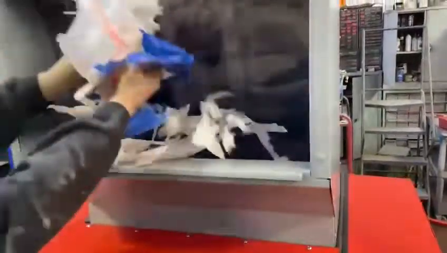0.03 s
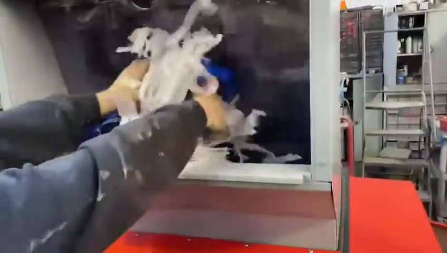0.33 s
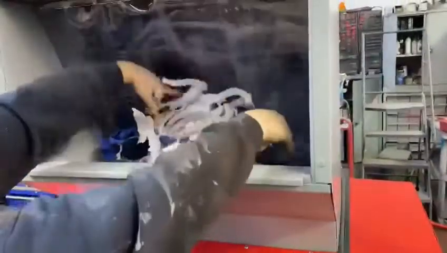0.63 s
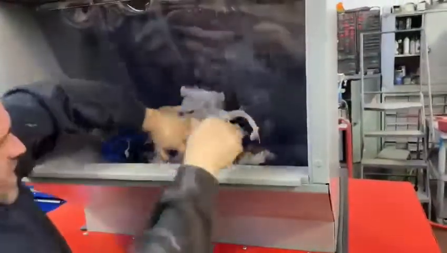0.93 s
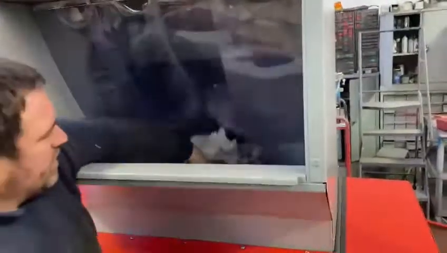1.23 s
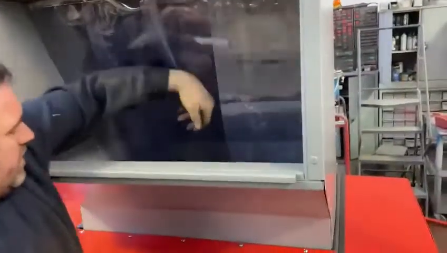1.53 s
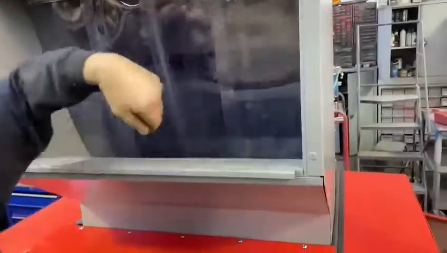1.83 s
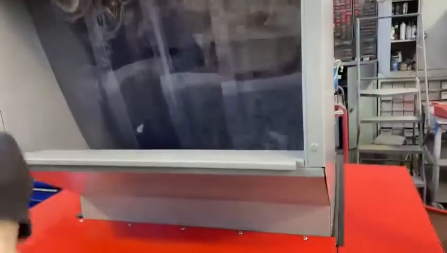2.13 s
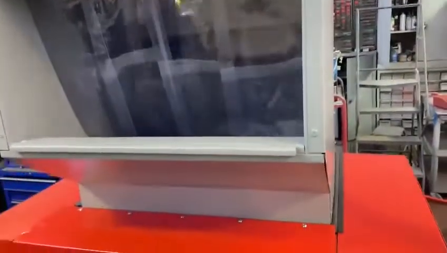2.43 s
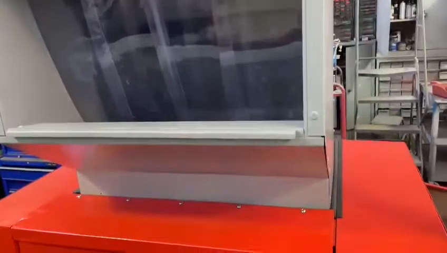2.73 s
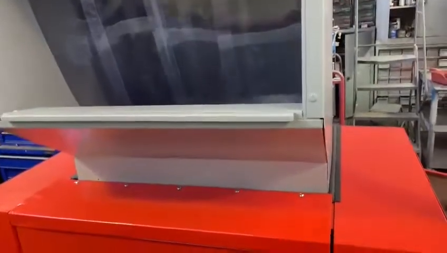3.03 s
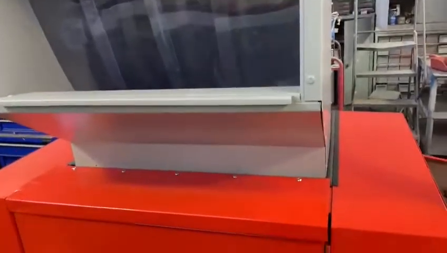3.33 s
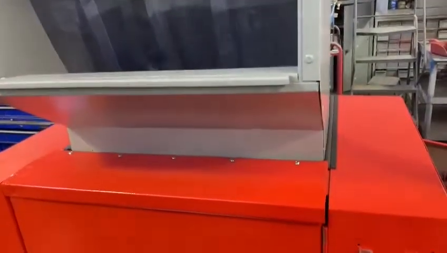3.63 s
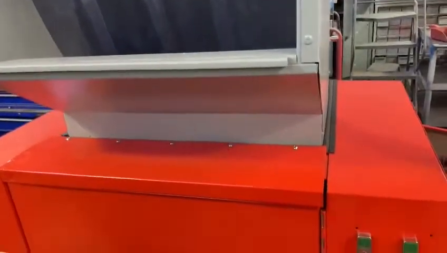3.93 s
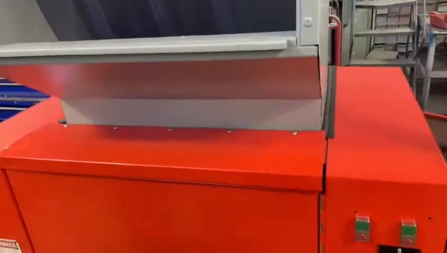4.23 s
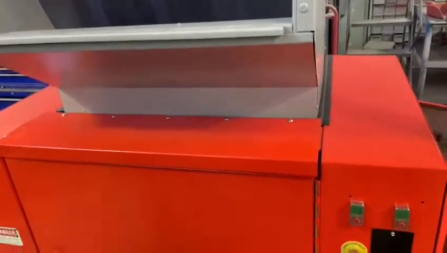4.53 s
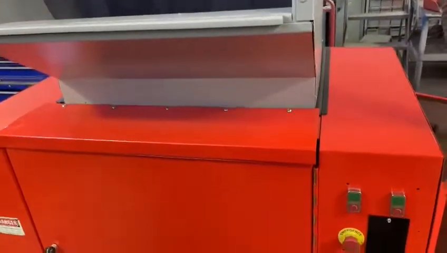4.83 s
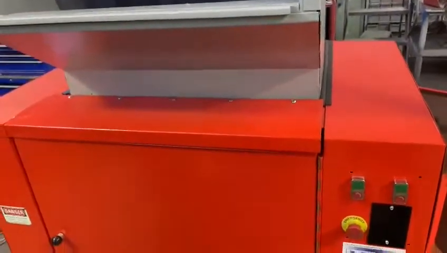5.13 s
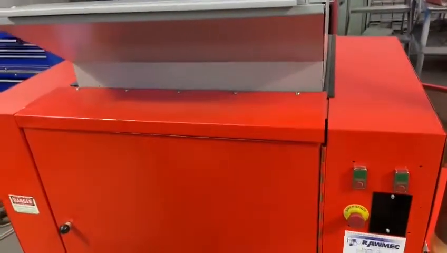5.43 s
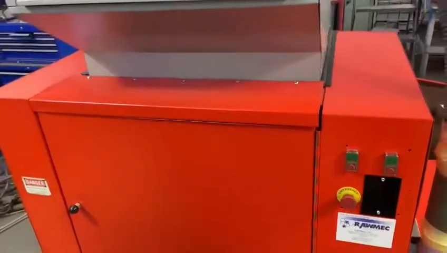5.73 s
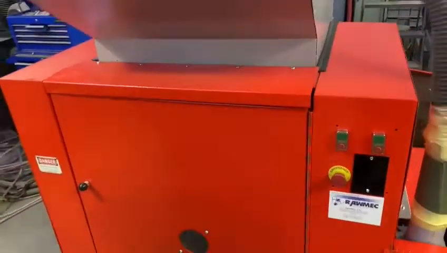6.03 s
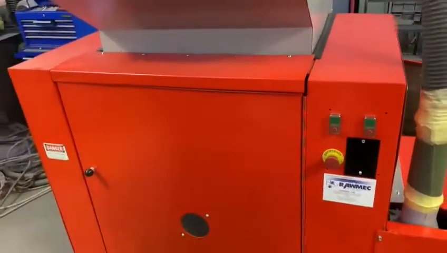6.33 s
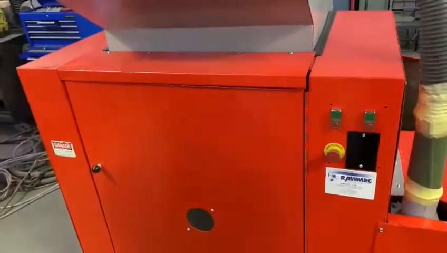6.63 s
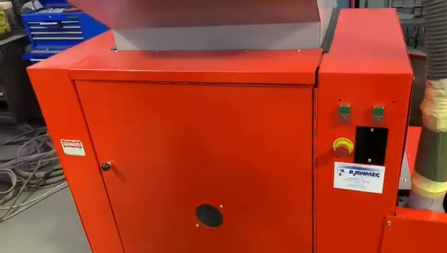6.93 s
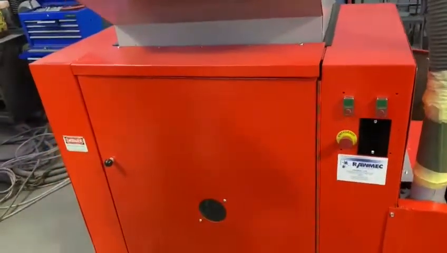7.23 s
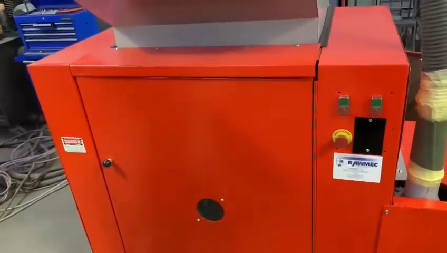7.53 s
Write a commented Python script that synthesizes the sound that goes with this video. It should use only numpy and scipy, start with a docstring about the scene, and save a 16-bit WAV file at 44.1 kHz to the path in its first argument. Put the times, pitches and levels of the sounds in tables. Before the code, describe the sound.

Plastic scraps crunch and crack in a workshop grinding machine, its motor roaring steadily while fragments hail and hiss inside.

```python
"""Plastic granulator chewing strips

Strips rustle and squeal into the hopper (the feed funnel) of a machine in a workshop. A rotor with
three knives drones and chops them in surges. Chips hail against the steel chamber and ring its panels,
while a suction blower hums and draws the fine granules off with a hiss.
We listen from in front of the hopper, then lower down by the cabinet."""
import sys
import numpy as np
from scipy import signal
from scipy.fft import rfft, irfft
from scipy.io import wavfile
from scipy.ndimage import uniform_filter1d

SR = 44100
rng = np.random.default_rng(int(sys.argv[2]) if len(sys.argv) > 2 else 0)


def master_out(mix):
    """Clip the mix to full scale and print it as 16-bit PCM to the path in sys.argv[1]."""
    frames = np.transpose(np.atleast_2d(mix))
    ceiling = np.clip(frames, -1, 1)
    pcm = np.round(ceiling * 32767).astype(np.int16)
    wavfile.write(sys.argv[1], SR, pcm)


N = 343980
TIME, FREQ_HZ = np.arange(N) / SR, np.arange(N // 2 + 1) * SR / N
ROTOR_HZ, BLOWER_HZ = 23.19, 49.22  # turns per second
KNIVES, VANES = 3, 8  # blades on the rotor and in the blower
DIRECT = np.array([[1], [0]])  # sounds have two rows, direct and scattered; this keeps the first

# hard plastic crunching, heard through the hopper mouth: pitch_hz, width_hz, level_db
CRUNCH_MODES = [(1659, 55, 3.5), (1973, 260, 2), (2120, 280, -5.5), (2470, 160, -0.5)]
# notes of the air in the hopper: pitch_hz, width_hz, level_db
HOPPER_MODES = [(477, 57, 4.5), (577, 25, -3.5), (772.5, 22.6, 5.5), (826.5, 9.6, 2.5), (885, 6.8, 6.5),
                (995.6, 9.4, 5.5)]
# note of a ringing steel panel: pitch_hz, width_hz, level_db
PANEL_MODES = [(1294, 14, 0)]
# how squarely the listener faces the hopper mouth: time_s, level_db
FACING_MOUTH = [(0, 6), (3.2, -4.5), (4.5, -7), (7.8, -6.5)]


def knives(turns, chop_db, scatter_db=5, jitter_s=0.002255, crunch_db=-5, thump_db=-5):
    """Each passing knife cuts a random amount of plastic, thumping the chamber and crunching briefly."""
    # boom of the cutting chamber: pitch_hz, width_hz, level_db
    chamber_modes = [(93.5, 8.9, 1.5), (119.6, 18, 6.5), (143.5, 14, 4), (159.6, 8.7, -4), (233, 50, -3.5),
                     (354, 13, -1), (501, 130, -10)]
    pass_s = np.interp(np.arange(int(turns[-1] * KNIVES)) / KNIVES, turns, TIME)
    lateness, amount = rng.standard_normal((N // 100, 2))[:len(pass_s)].T
    cuts = unit(clicks(pass_s + jitter_s * lateness, undb(scatter_db * np.tanh(amount))))
    crunch = undb(crunch_db) * bursts(cuts, decay_s=0.0055)
    thumps = boom(cuts * DIRECT + crunch, chamber_modes)
    return thumps / thumps[0].std() * undb(chop_db + thump_db)


def splitting(chop_db, split_db=-10):
    """The harder the knives chop, the louder the plastic splits, in a rough run of small cracks."""
    # tone of splitting plastic: frequency_hz, level_db
    split_colour = [(250, -13.5), (600, 4.5), (1000, -2.5), (1700, -8.5), (2700, -8), (4100, 6.5),
                    (5200, -14), (10000, -25)]
    cracks = bursts(hail(330, spread_db=1.5), decay_s=0.0027)
    return colour(cracks, split_colour) * undb(chop_db + split_db)


def bites(bang_peak_db=-10.5, crack_peak_db=-17):
    """Thick pieces caught by the knives hammer the knife bed, blow after blow, and crack apart."""
    # blows on thick pieces: start_s, bang_db, crack_db
    blows = [(1.006, -5, 12), (1.052, -8, 7), (1.1, -8, 9), (1.698, -4, 7), (1.713, 12, 10),
             (1.728, 13.5, 6), (1.744, 12, 5), (1.757, 4, 1), (1.804, 5, 4), (1.816, 8, 1), (1.830, 7, 2),
             (1.846, 2, 1), (1.86, 8, 0), (1.873, 8, 4), (1.894, 4, -4), (2.018, 0, 13.5), (2.998, 3, 12),
             (3.584, 3.5, -12), (4.39, 7.5, -9), (5.433, 7, -8), (5.463, 10.5, -4), (5.476, 13, -4),
             (5.491, 5, -8), (5.511, 12, -6), (5.778, 5, -10), (6.683, 10, -2), (7.017, 1, 4)]
    # notes of the knife bed under a heavy blow: pitch_hz, width_hz, level_db
    bed_modes = [(114, 40, 6.5), (158, 35, -4.5), (348, 36, -2.5), (567, 290, -17)]
    start_s, bang_db, crack_db = np.transpose(blows)
    bangs = boom(clicks(start_s, undb(bang_db)), bed_modes, contact_hz=700)
    cracks = ring(bursts(clicks(start_s, undb(crack_db)), decay_s=0.04), CRUNCH_MODES)
    return set_peak(bangs, bang_peak_db) * DIRECT + set_peak(cracks, crack_peak_db)


def snaps(snap_db=-22.5, decay_s=0.0054, width_hz=900, splinter_db=-5):
    """A brittle piece breaks with a bright crack, pitched by its size, and a spit of splinters."""
    # pieces that snap: start_s, pitch_hz, level_db
    pieces = [(0.797, 5960, 0.5), (1.2105, 3520, 6), (4.22, 4130, 0), (4.475, 5700, 0), (5.467, 4220, 2.5),
              (6.14, 3880, -5), (7.742, 5840, -2.5)]
    out, t = np.zeros((2, N + SR)), TIME[:SR // 20]
    splinter_band = signal.butter(2, [1800, 6500], "band", fs=SR, output="sos")
    for start_s, pitch_hz, level_db in pieces:
        noise = rng.standard_normal((2, len(t)))
        note = ping(pitch_hz, 1 / (np.pi * width_hz))
        crack = unit(signal.fftconvolve(noise, note[None])[:, :len(t)])
        splinters = unit(signal.sosfilt(splinter_band, noise)) * undb(splinter_db)
        fade = np.exp(-t / decay_s) * undb(level_db + snap_db)
        out[:, int(start_s * SR):][:, :len(t)] += (crack + splinters) * fade
    return out[:, :N]


def chips(turns, hail_db, hiss_db, throb_db=0.5, flutter_db=1.57, hail_share=0.33):
    """Small chips flung round once a turn hit the walls; coarse ones crunch out of the hopper mouth."""
    # tone of small chips on steel: frequency_hz, level_db
    chip_colour = [(150, -41), (450, -2), (1100, 4.5), (1500, -4.5), (2200, -3), (3000, 3), (4400, 3),
                   (6000, -2.5), (9000, -4.5), (11500, -21.5)]
    small_db = hail_share * hail_db + (1 - hail_share) * hiss_db  # they linger with the fine granules
    small = colour(bursts(hail(3800, spread_db=2), decay_s=0.01), chip_colour) * undb(small_db + 3.5)
    coarse_db = hail_db + over_time(FACING_MOUTH) - 0.5
    coarse = ring(bursts(hail(450, spread_db=0), decay_s=0.0024), CRUNCH_MODES) * undb(coarse_db)
    return (small + coarse) * undb(throb_db * np.cos(2 * np.pi * turns) + flutter_db * wander(19))


def rattle(hail_db, hiss_db, low_hz=1398, high_hz=6206, spread_db=3, hail_share=0.48, count=2600):
    """Flakes bounce off the walls, each with a short ring: the smaller the flake, the higher its pitch."""
    out = np.zeros(N + SR)
    for when, smallness, force in rng.random((count, 3)):
        strength = undb(spread_db * min(-np.log(1 - force), np.pi))  # many weak, a few strong
        bounce = ping(low_hz + smallness * (high_hz - low_hz), decay_s=0.013) * strength
        out[int(when * N):][:len(bounce)] += bounce
    level_db = hail_share * hail_db + (1 - hail_share) * hiss_db - 4
    return unit(out[:N]) * undb(level_db) * DIRECT


def granules(turns, hiss_db, throb_db=0.17, flutter_db=1.28):
    """Fine granules spray through the machine's sieve, pulsing slightly with the rotor."""
    # tone of the spray: frequency_hz, level_db
    hiss_colour = [(800, -29), (2000, -5), (2900, 6.5), (3600, -8), (6000, 2.5), (9000, -1.5),
                   (11000, -1.5), (14000, -23.5)]
    spray = bursts(hail(3200, spread_db=-2.5), decay_s=0.0062)
    pulse_db = throb_db * np.cos(2 * np.pi * turns) + flutter_db * wander(22)
    return colour(spray, hiss_colour) * undb(hiss_db + pulse_db)


def rotor(turns, chop_db, drone_db=-32.5, housing_db=-35, judder_turns=0.0031):
    """The rotor judders and drones harder under load, and its housing sings along."""
    # tones of the drone: cycles_per_turn, level_db
    drone_tones = [(4, -3.5), (5, -3.5), (6, -9.5), (9, -5.5), (10, -9.5), (11, -10), (12, -10.5), (15, -8),
                   (16, -6.5), (27, -11)]
    load_db = uniform_filter1d(chop_db - chop_db.mean(), size=SR // 6)  # a heavy rotor reacts slowly
    shaft = turns + judder_turns * wander(9.1)
    drone = tones(shaft, drone_tones, waver_db=2.5, waver_hz=1.64) * undb(0.8 * load_db + drone_db)
    housing = tones(shaft, [(7, 0)], waver_db=2, waver_hz=6) * undb(0.93 * load_db + housing_db)
    return (drone + housing) * DIRECT


def steel(hail_db, hopper_db=-36.5, panel_db=-41, waver_db=2.5):
    """Tumbling scrap rings the hollow hopper and one panel, both louder as more chips fly."""
    busy_db = hail_db - hail_db.mean()
    taps = bursts(hail(600, spread_db=0.5), decay_s=0.00084)
    swell_db = 0.5 * busy_db + 0.6 * over_time(FACING_MOUTH) + waver_db * wander(18)
    hopper = ring(taps, HOPPER_MODES) * undb(hopper_db + swell_db)
    panel = ring(taps, PANEL_MODES) * undb(panel_db + 0.32 * busy_db)
    return hopper + panel * DIRECT


def knocks(peak_db=-19):
    """A lump hits the hopper wall with a hollow knock; where it lands decides which note rings most."""
    # lower and upper note of the sheet-steel wall: pitch_hz, width_hz, level_db
    wall_modes = [(234, 12, 0), (380, 14, 0)]
    # lumps flung at the wall: start_s, lower_note_db, upper_note_db
    lumps = [(0.72, -2, -22), (2.386, -13, 1.5), (7.018, -2.5, -12)]
    start_s, *notes_db = np.transpose(lumps)
    wall = np.zeros(N)
    for mode, strengths in zip(wall_modes, undb(notes_db)):
        wall += ring(clicks(start_s, strengths), [mode]) * np.linalg.norm(strengths)
    return set_peak(wall, peak_db) * DIRECT


def groans(from_hz=226, to_hz=238):
    """The hopper wall groans under a heavy cut, rising a little as the rotor pulls through."""
    # groans of the wall: start_s, length_s, level_db
    heavy_cuts = [(1.801, 0.14, -36), (2.86, 0.68, -33.5), (3.06, 0.14, -30), (4.419, 0.16, -29.5),
                  (4.7, .15, -32.5), (5.419, .5, -36), (6.759, .36, -33.5)]
    notes = [(start_s, length_s, from_hz, to_hz, db) for start_s, length_s, db in heavy_cuts]
    return glides(notes, wobble=0.006, rough_db=-1)


def panel_rings():
    """Scrap drags along the steel panel and makes it sing for a moment."""
    # drags on the panel: start_s, length_s, level_db
    drags = [(1.121, 0.063, -36), (2.16, 0.097, -34.5), (2.78, .14, -32), (2.94, 0.088, -34),
             (3.319, 0.19, -34.5), (5.319, 0.069, -36), (5.49, .11, -33), (6.03, 0.099, -39),
             (6.66, 0.14, -35), (6.789, .18, -37), (6.993, 0.2, -40)]
    pitch_hz = PANEL_MODES[0][0]
    notes = [(start_s, length_s, pitch_hz, pitch_hz, db) for start_s, length_s, db in drags]
    return glides(notes, wobble=0.01, rough_db=4)


def skitters(gain_db=-41):
    """A larger scrap rattles along the wall for a moment; the hopper rings out."""
    # skittering scraps: start_s, level_db
    scraps = [(0.979, -1), (2.801, -6.5), (3.05, 2.5), (6.69, -5), (7.0, -3)]
    start_s, level_db = np.transpose(scraps)
    return ring(bursts(clicks(start_s, undb(level_db)), decay_s=0.15), HOPPER_MODES) * undb(gain_db)


def squeals():
    """A strip sticks and slips on the steel in a brief, unsteady tone."""
    # rubbing strips: start_s, length_s, from_hz, to_hz, level_db
    rubs = [(0.06, 0.14, 762, 828, -36), (0.725, 0.13, 886, 905, -37), (0.817, 0.045, 1282, 1312, -31),
            (0.852, 0.032, 1135, 956, -34), (0.855, 0.03, 903, 870, -29), (1.31, 0.04, 1600, 1570, -35.5),
            (2.707, 0.4, 886, 874, -33)]
    return glides(rubs, wobble=0.012, rough_db=2.5)


def feeding(level_db=-36, let_go_s=0.76, fade_s=0.25, waver_db=2):
    """Stiff strips crackle and scrape over each other as a hand pushes them in, then lets go."""
    # tone of loose strips rubbing together: frequency_hz, level_db
    rustle_colour = [(500, -30), (900, 6), (1300, 1), (1900, -13), (2700, 1), (4000, -22), (10000, -26)]
    pushing = np.clip(1 - (TIME - let_go_s) / fade_s, 0, 1)
    rustle = colour(bursts(hail(260, spread_db=0.5), decay_s=0.01), rustle_colour)
    return rustle * pushing * undb(level_db + waver_db * wander(14))


def blower(hum_db=-36, far_db=-43, near_db=-32.2, stoop_s=(5.7, 6.45)):
    """The blower hums; the note of its passing vanes grows as the listener stoops to the cabinet."""
    # tones of the hum: cycles_per_turn, level_db
    hum_tones = [(1, 0), (2, -4.5), (3, -6.5), (4, -5), (5, -3.5), (7, -4), (9, -8.5)]
    turns = BLOWER_HZ * TIME + 0.006 * wander(1.5)
    hum = tones(turns, hum_tones, waver_db=2.5, waver_hz=0.58) * undb(hum_db)
    vane_db = np.interp(TIME, stoop_s, [far_db, near_db])
    vanes = tones(turns, [(VANES, 0)], waver_db=1, waver_hz=2.9) * undb(vane_db)
    return (hum + vanes) * DIRECT


def air_roar(level_db=-35, waver_db=0.89):
    """Air churned by the rotor and blower fills the workshop with a low roar."""
    # tone of the churned air: frequency_hz, level_db
    roar_colour = [(20, -10), (40, -2), (65, 5.5), (100, 4), (240, 4.5), (310, 4.5), (400, 1), (600, -3.5),
                   (800, -37.5), (1600, -5.5), (4000, -47)]
    return colour(rng.standard_normal((2, N)), roar_colour) * undb(level_db + waver_db * wander(3.9))


def workload(idle_db=(-30.5, -44, -31.5), emptying_db_per_s=0.4355):
    """Levels in dB of chopping, chip hail and hiss: each wad of strips swells, holds and dies away."""
    # wads dragged into the knives: start_s, rise_s, hold_s, decay_s, chop_db, hail_db, hiss_db
    wads = [(0.0, 0.018, 0.2, 0.16, -30, -48, -61), (0.939, 0.078, 0.19, 0.3, -31.5, -36, -26.5),
            (1.66, 0.06, 0.12, 0.43, -26, -25.5, -28.5), (2.714, 0.29, 0.06, 0.35, -23, -27, -29),
            (3.921, 0.3, 0.3, 0.28, -23.5, -28.5, -33.5), (4.666, 0.11, 0.01, .04, -24, -40, -58),
            (5.286, 0.14, 0.091, 0.27, -22, -29.5, -35.5), (5.623, 0.058, 0.061, 0.19, -26.5, -36, -55),
            (6.53, 0.15, 0.22, 0.26, -24, -36, -35.5)]
    # scrap keeps circling between wads, thinning out as the chamber empties
    power = undb(np.array(idle_db)[:, None] - emptying_db_per_s * (TIME - TIME.mean())) ** 2
    for start_s, rise_s, hold_s, decay_s, *levels_db in wads:
        swell = np.clip((TIME - start_s) / rise_s, 0, 1)
        fade = np.exp(-np.maximum(TIME - start_s - rise_s - hold_s, 0) / decay_s)
        power += (undb(levels_db)[:, None] * swell * fade) ** 2
    return 10 * np.log10(power)


def stereo(pair):
    """Share direct and scattered sound between left and right; the low middle pitches lean left."""
    # how alike the two sides are: frequency_hz, likeness (0 to 1), left_lead_degrees
    side_match = [(60, .99, 0), (240, .95, 0), (450, .8, 10), (720, .4, -55), (1200, .72, -52),
                  (2000, .95, 0), (2300, .9, 10), (2700, .62, 50), (3300, .64, 130), (4000, .42, 90),
                  (4550, .3, 125), (4900, .97, 0), (5600, .97, 0), (6100, .55, 100), (6450, 1, 180),
                  (8700, 1, 180), (9300, .5, 260), (9800, 1, 360)]
    # how much louder the left side is: frequency_hz, left_minus_right_db
    balance = [(50, -0.5), (110, 2), (200, 3.5), (350, 5.3), (580, 8.5), (720, 5.5), (900, 5.3), (1250, 1),
               (2000, 0.3), (3500, -0.4), (5000, 0)]
    direct, scattered = rfft(pair)
    hz, likeness, lead_degrees = np.transpose(side_match)
    likeness = over_frequency(np.c_[hz, likeness])
    lead = np.radians(over_frequency(np.c_[hz, lead_degrees]))
    side = np.array([[1], [-1]])  # left, right
    both = direct * np.sqrt((1 + likeness) / 2) + side * scattered * np.sqrt((1 - likeness) / 2)
    return irfft(both * undb(side * over_frequency(balance) / 2) * np.exp(1j * side * lead / 2), N)


def undb(db):
    """Turn decibels into a factor to multiply by."""
    return 10 ** (np.asarray(db) / 20)


def unit(x):
    """Scale x to an average strength (rms) of 1."""
    return x / np.sqrt(np.mean(x ** 2))


def set_peak(x, peak_db):
    """Scale x so that its largest swing is at peak_db."""
    return x / np.abs(x).max() * undb(peak_db)


def over_time(points):
    """Join (time_s, value) points with straight lines."""
    return np.interp(TIME, *np.transpose(points))


def over_frequency(points):
    """Join (frequency_hz, value) points, giving every octave equal room."""
    hz, value = np.transpose(points)
    return np.interp(np.log(FREQ_HZ + 1), np.log(hz), value)


def colour(x, points):
    """Shape the bass, middle and treble of x; strength 1."""
    return unit(irfft(rfft(x) * undb(over_frequency(points)), N))


def ring(x, modes):
    """Let x shake an object's own notes (modes); narrower ones ring longer; strength 1."""
    s = 1j * FREQ_HZ
    response = sum(undb(db) * s * width / (s ** 2 + s * width + hz ** 2) for hz, width, db in modes)
    return unit(irfft(rfft(x) * response, N))


def boom(force, modes, contact_hz=800, low_hz=78):
    """A soft contact rounds off each blow; the cabinet booms but gives off little deep bass."""
    push = irfft(rfft(force) / (1 + 1j * FREQ_HZ / contact_hz) ** 2, N)
    return signal.sosfilt(signal.butter(3, low_hz, "high", fs=SR, output="sos"), ring(push, modes))


def wander(rate_hz):
    """A smooth random drift, with wiggles up to about rate_hz; strength 1."""
    return unit(irfft(rfft(rng.standard_normal(N)) * np.exp(-(FREQ_HZ / rate_hz) ** 2), N))


def clicks(times_s, sizes):
    """Blows one sample long at the given times."""
    return np.bincount(np.clip(times_s * SR, 0, N - 1).astype(int), sizes, N)


def hail(per_second, spread_db):
    """Tiny hits at random moments; spread_db makes a few stronger (or weaker, if negative)."""
    hit = rng.random(N) < per_second / SR
    return hit * undb(spread_db * np.minimum(rng.exponential(size=N), 2 * np.pi))


def bursts(blows, decay_s):
    """Each blow sets off a fading puff of noise; two unrelated rows, strength 1."""
    energy = signal.lfilter([1], [1, -np.exp(-2 / (decay_s * SR))], blows ** 2 + 1e-18)
    return unit(np.sqrt(energy) * rng.standard_normal((2, N)))


def ping(pitch_hz, decay_s):
    """One stiff piece of plastic rings at its own pitch and dies away."""
    t = TIME[:SR // 20]
    return np.exp(-t / decay_s) * np.sin(2 * np.pi * pitch_hz * t)


def tones(turns, harmonics, waver_db, waver_hz):
    """Tones locked to a turning shaft, each wavering in level by itself; strength 1."""
    out = np.zeros(N)
    for cycles_per_turn, level_db in harmonics:
        gain = undb(level_db + waver_db * wander(waver_hz))
        out += gain * np.sin(2 * np.pi * (cycles_per_turn * turns + rng.random()))
    return unit(out)


def glides(notes, wobble, rough_db):
    """Unsteady tones that swell, slide from one pitch to another and stop."""
    out = np.zeros(N)
    unsteady = 1 + wobble * wander(60)
    grip = undb(rough_db * wander(45))
    for start_s, length_s, from_hz, to_hz, level_db in notes:
        on = (TIME >= start_s) & (TIME < start_s + length_s)
        along = (TIME[on] - start_s) / length_s
        cycles = np.cumsum((from_hz + (to_hz - from_hz) * along) * unsteady[on]) / SR
        swell = np.sqrt(2 * np.sin(np.pi * along))
        out[on] += undb(level_db) * swell * grip[on] * np.sin(2 * np.pi * cycles)
    return out * DIRECT


def scene():
    """Mix all the sounds; the rotor sets the beat and slows a little as it cuts."""
    chop_db, hail_db, hiss_db = workload()
    slowing = 0.0003 * (chop_db - chop_db.mean())  # share of its speed that the rotor loses
    turns = np.cumsum(ROTOR_HZ * (1 - slowing)) / SR
    cutting = knives(turns, chop_db) + splitting(chop_db) + bites() + snaps() + groans()
    scrap = chips(turns, hail_db, hiss_db) + rattle(hail_db, hiss_db) + granules(turns, hiss_db)
    walls = steel(hail_db) + panel_rings() + skitters() + knocks()
    strips = feeding() + squeals()
    machine = rotor(turns, chop_db) + blower() + air_roar()
    return stereo(cutting + scrap + walls + strips + machine)


def record(dry):
    """Cut off the highest treble."""
    top_hz = 11600
    return signal.sosfilt(signal.ellip(10, .2, 80, top_hz, fs=SR, output="sos"), dry)


dry = scene()
out = record(dry)
master_out(out)
```